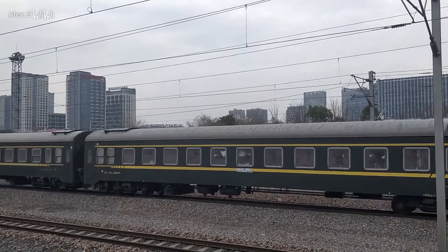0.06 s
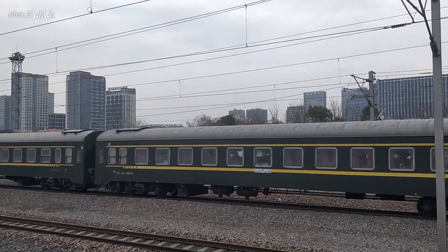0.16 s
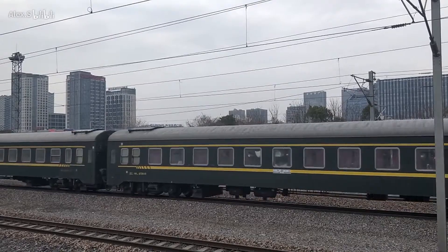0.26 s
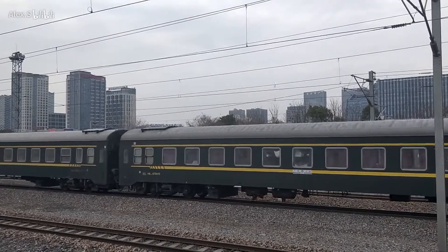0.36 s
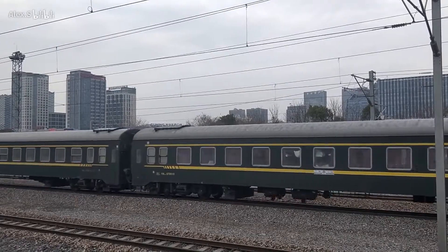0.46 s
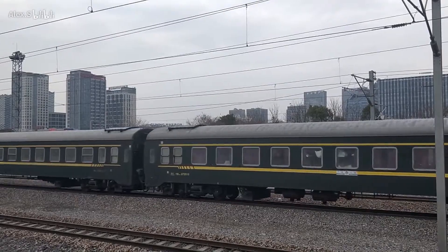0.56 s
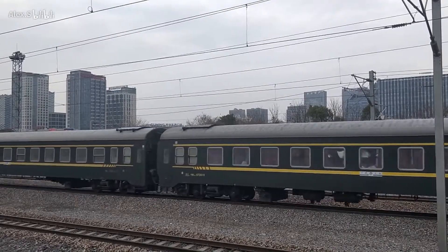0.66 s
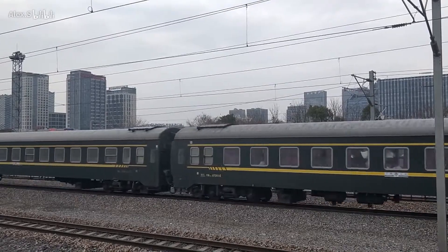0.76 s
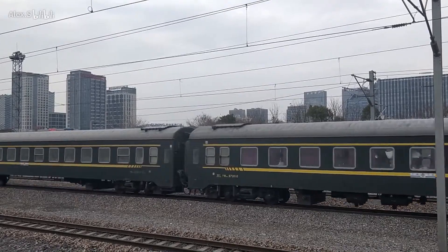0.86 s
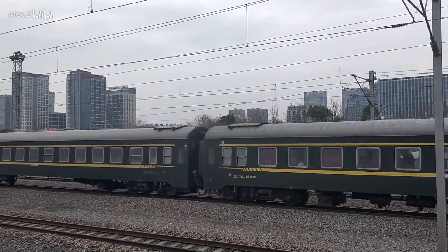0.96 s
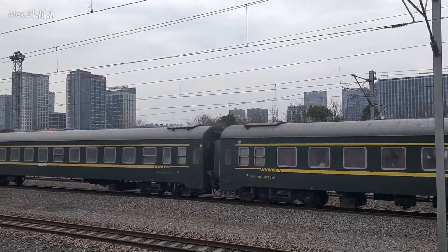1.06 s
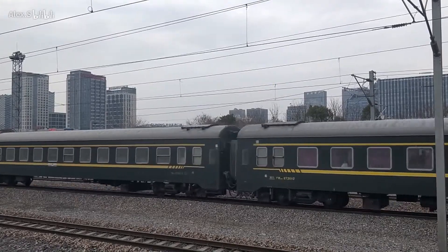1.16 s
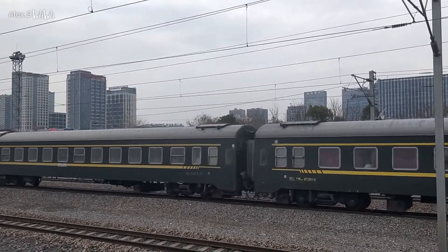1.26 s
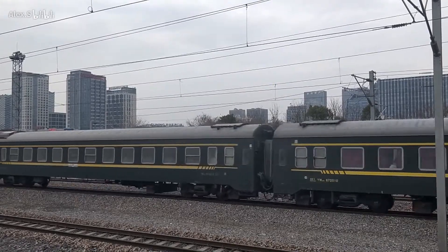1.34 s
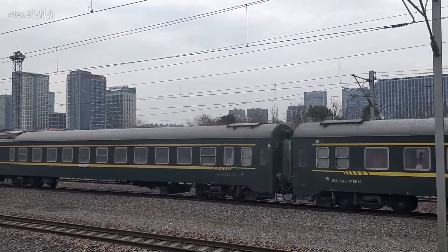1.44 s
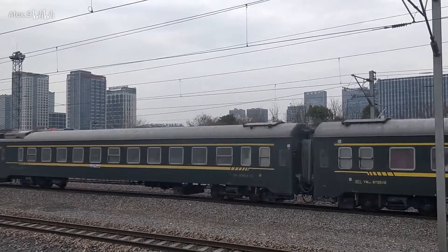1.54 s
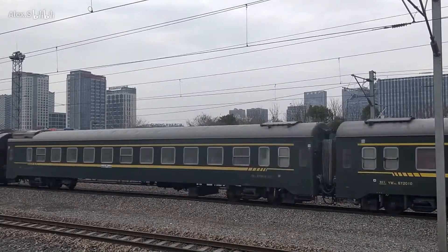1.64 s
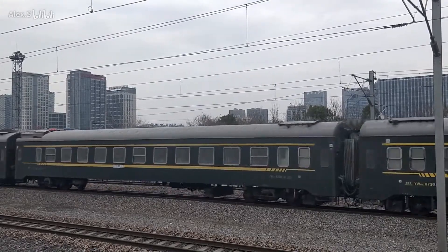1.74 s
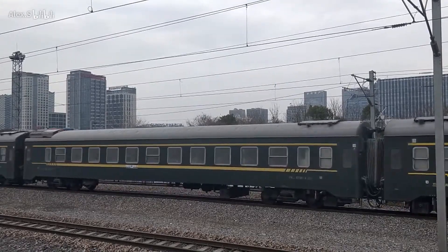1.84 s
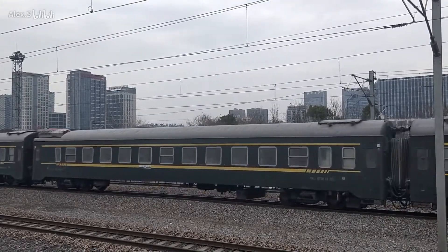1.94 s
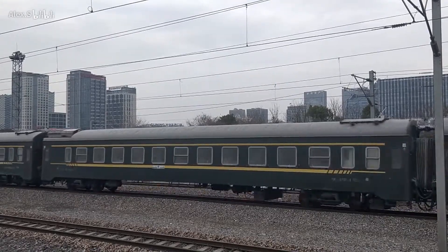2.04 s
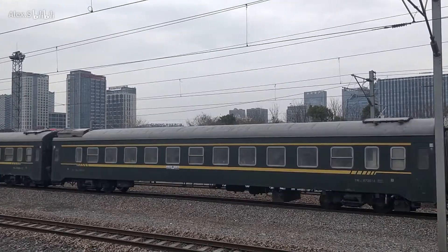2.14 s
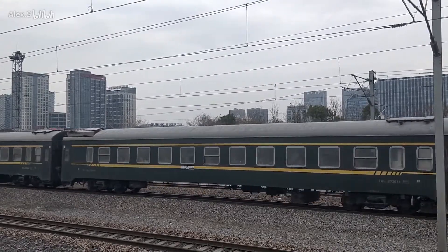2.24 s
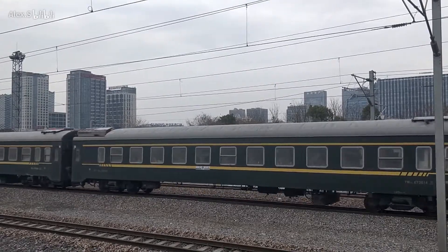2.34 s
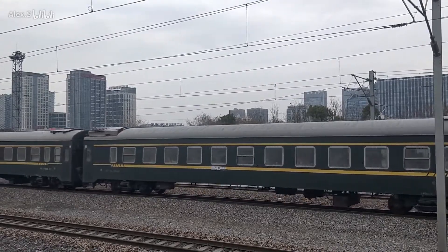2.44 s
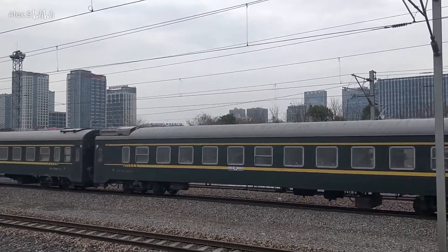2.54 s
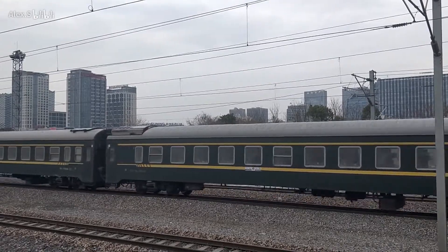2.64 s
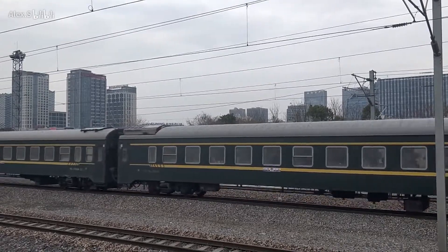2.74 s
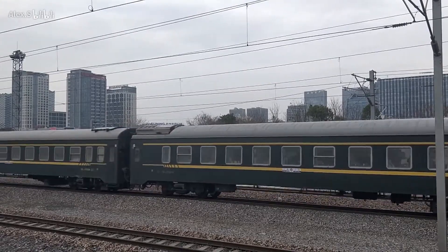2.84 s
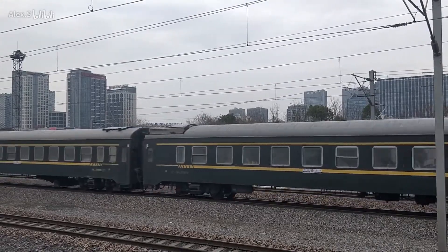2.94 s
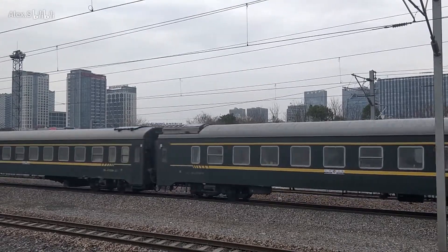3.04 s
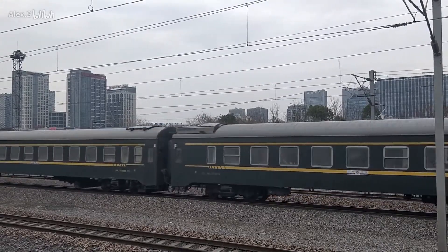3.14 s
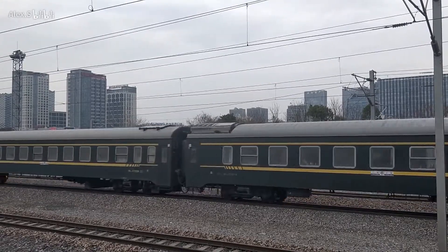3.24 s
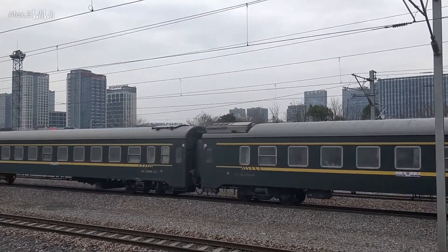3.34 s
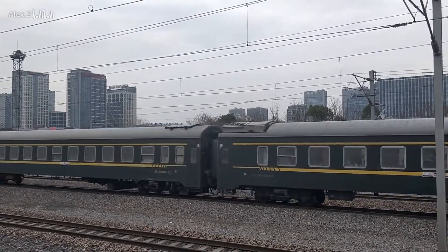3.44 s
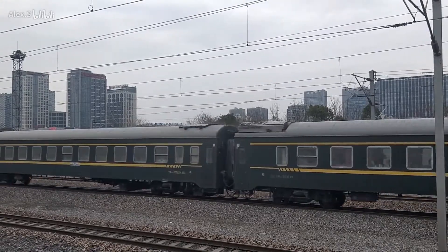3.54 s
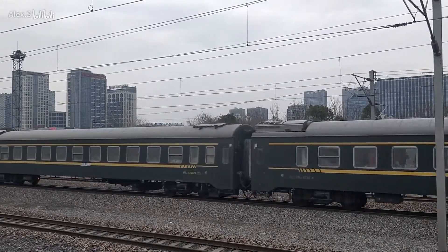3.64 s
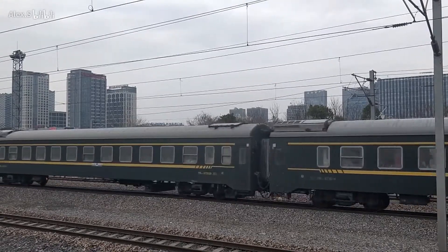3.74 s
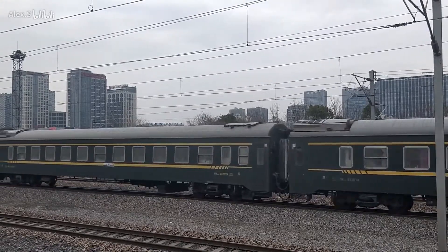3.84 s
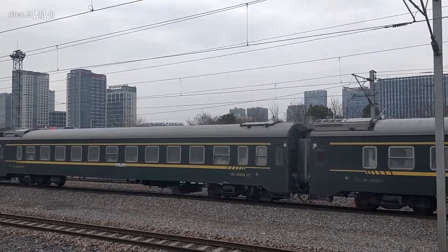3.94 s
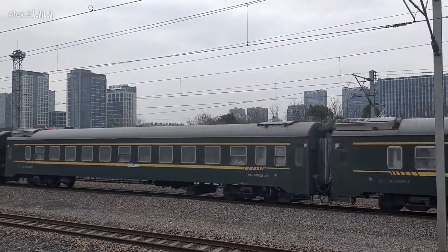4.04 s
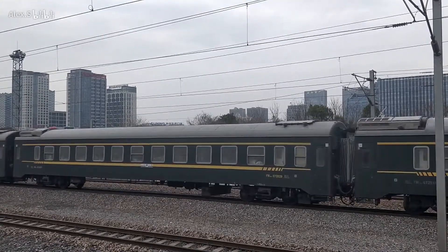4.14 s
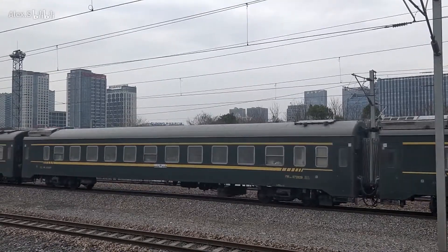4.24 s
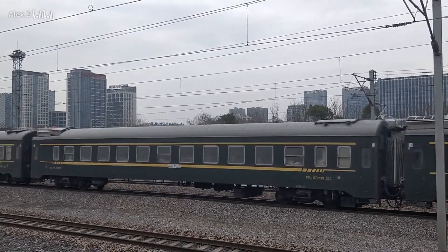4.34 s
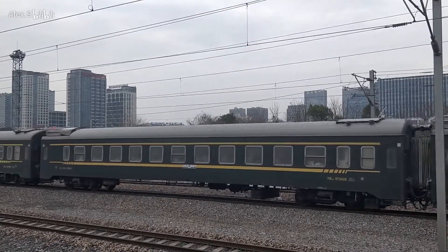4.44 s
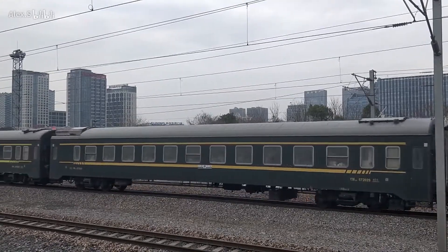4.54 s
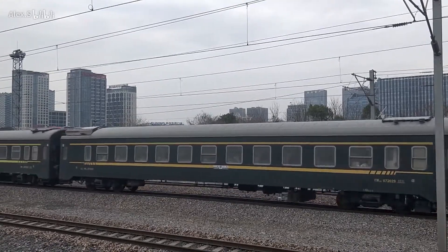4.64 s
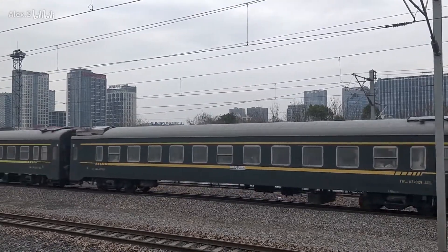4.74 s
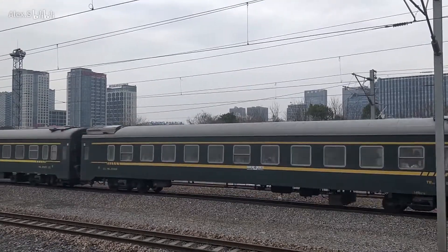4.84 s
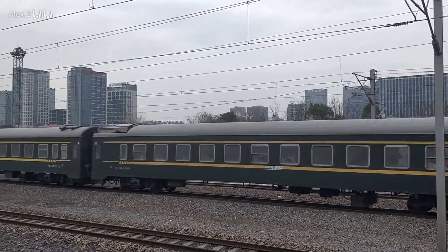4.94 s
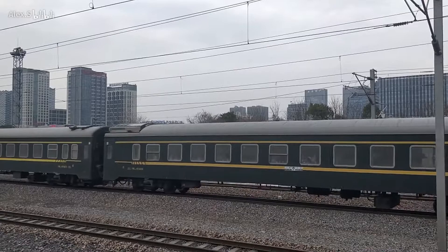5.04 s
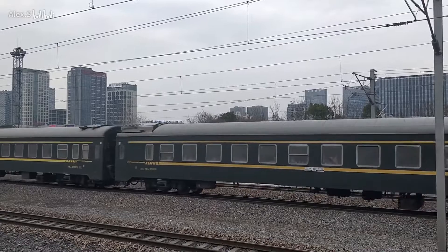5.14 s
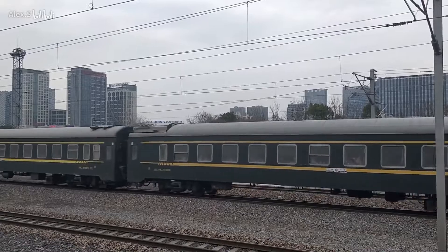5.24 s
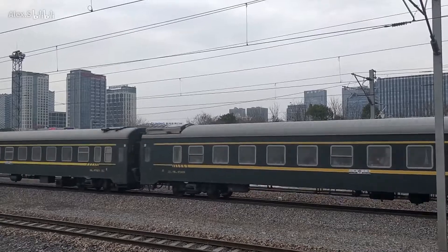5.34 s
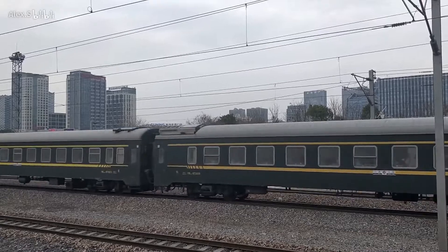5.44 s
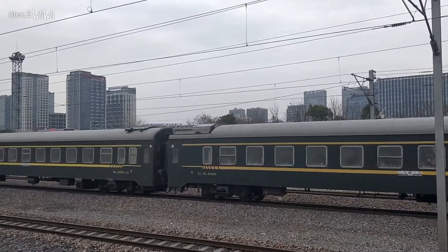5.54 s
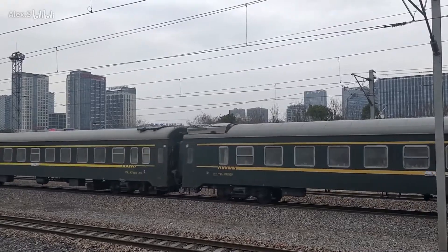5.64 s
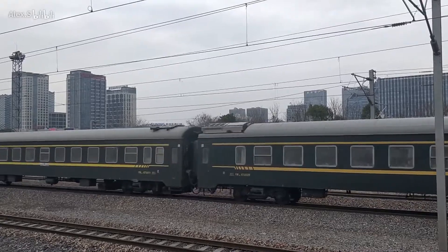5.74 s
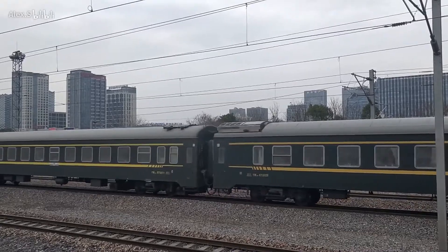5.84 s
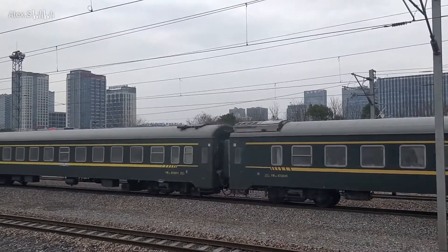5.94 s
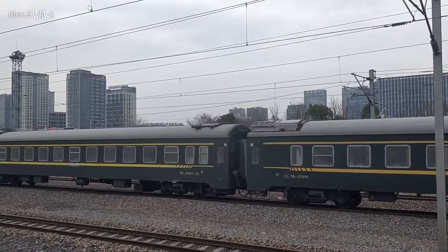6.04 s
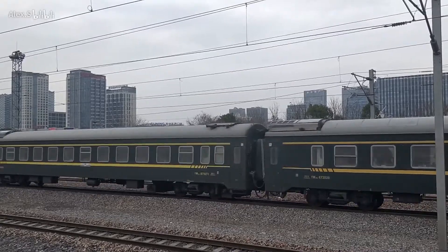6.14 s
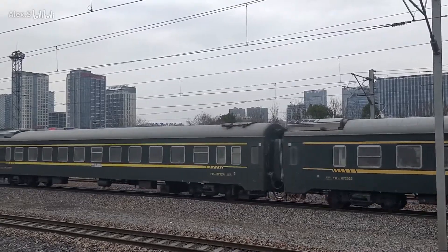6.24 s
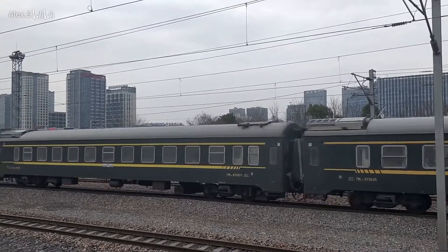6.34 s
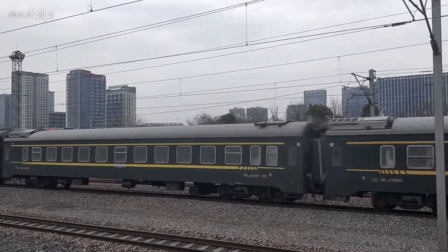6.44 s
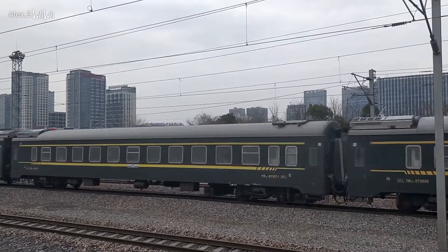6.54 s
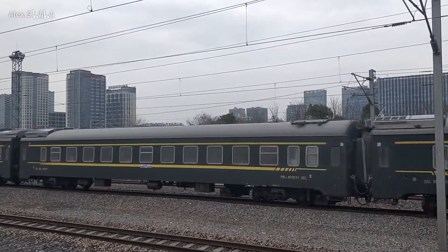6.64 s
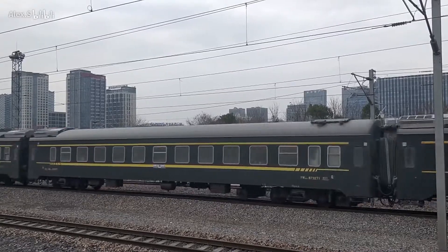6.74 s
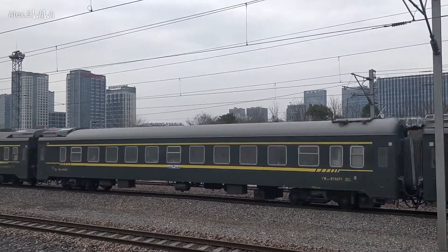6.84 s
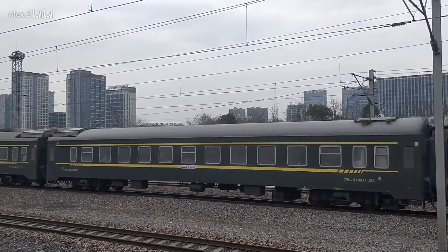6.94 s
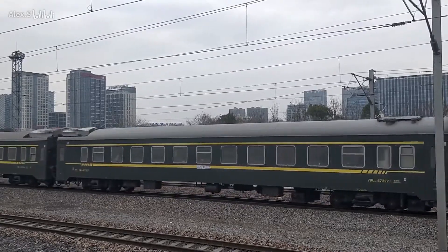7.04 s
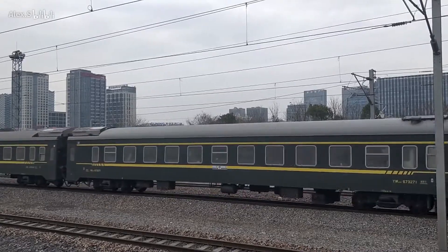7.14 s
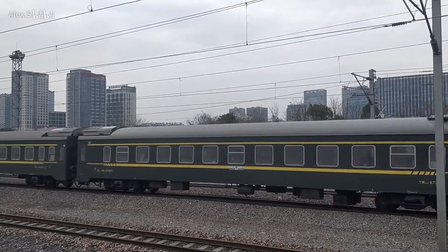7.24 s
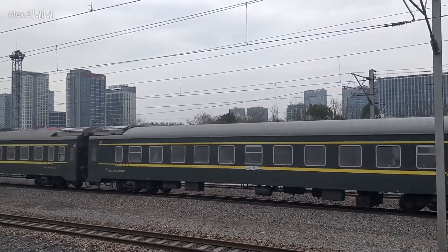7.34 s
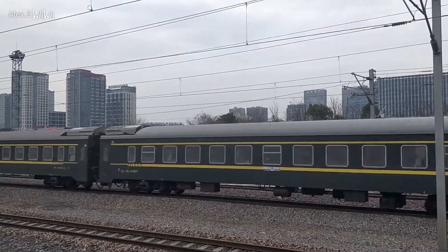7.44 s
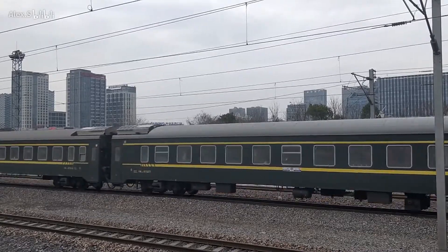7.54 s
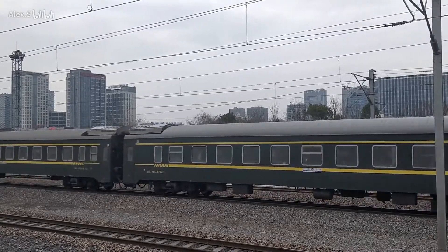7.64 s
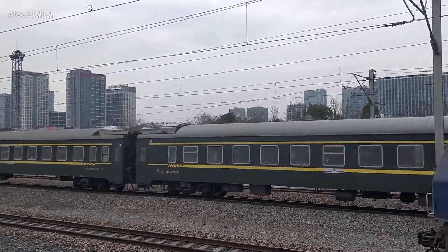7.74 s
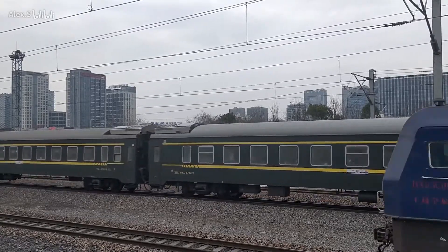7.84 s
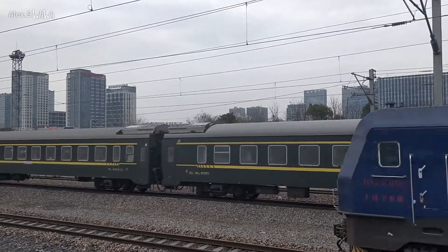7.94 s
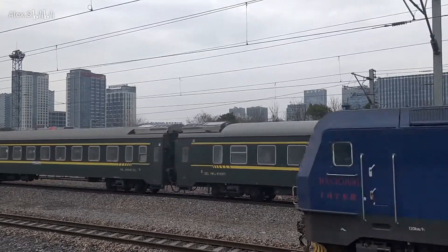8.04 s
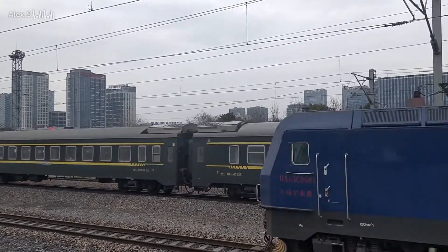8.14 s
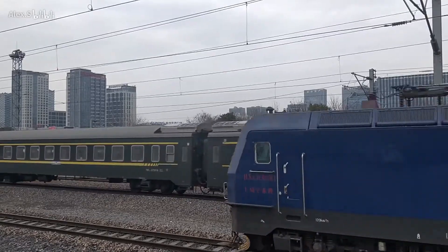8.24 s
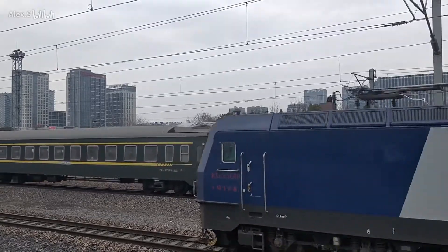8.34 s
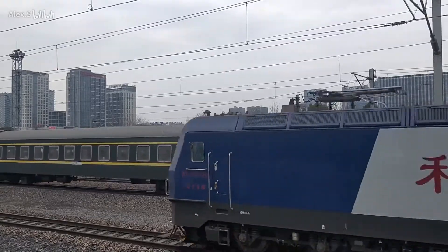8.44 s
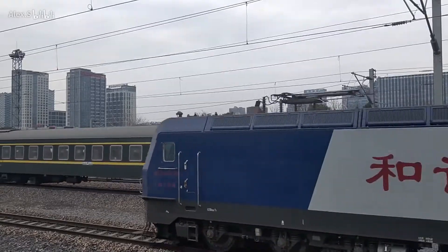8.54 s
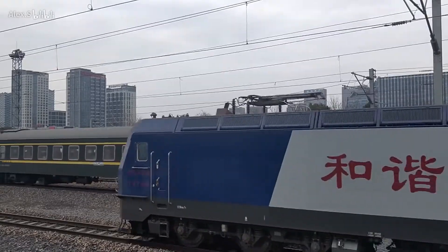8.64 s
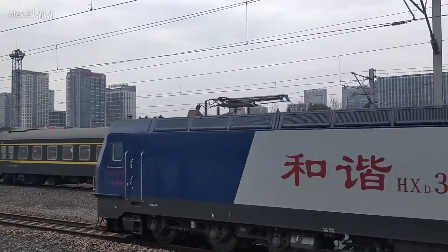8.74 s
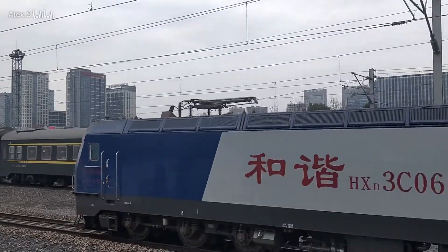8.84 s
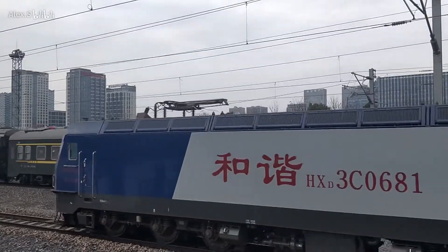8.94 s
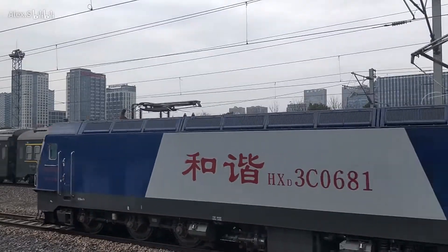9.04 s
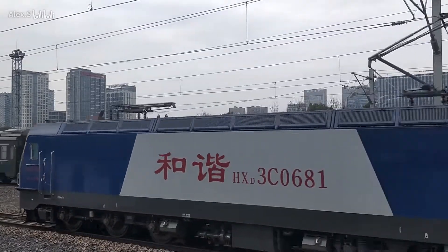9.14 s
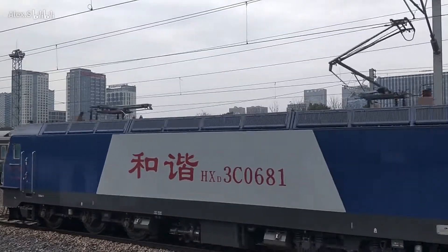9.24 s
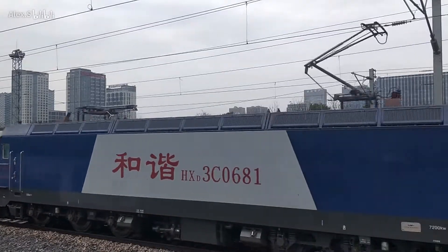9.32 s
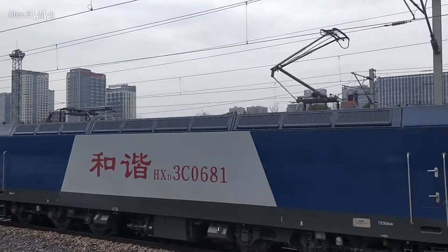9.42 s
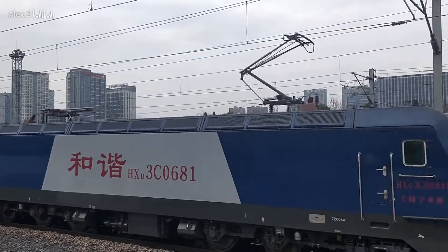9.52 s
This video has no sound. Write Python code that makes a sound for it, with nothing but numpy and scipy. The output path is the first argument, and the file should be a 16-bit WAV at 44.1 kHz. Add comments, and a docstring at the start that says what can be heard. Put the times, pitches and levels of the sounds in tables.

```python
"""Coach wheels hiss and ring from a passenger train rolling by on a far track, with one early knock and
a few rattles. An electric locomotive draws up from the right on a nearer track and comes by: wavering
narrow tones sink in pitch, blowers roar and running gear rumbles as shaped noise. The ground adds a deep
rumble. Two microphone ports a hand apart set the stereo by arrival time and colour.
"""
import sys
import numpy as np
from scipy import signal
from scipy.fft import rfft, irfft, next_fast_len
from scipy.io import wavfile
from scipy.ndimage import map_coordinates

SR = 44100
rng = np.random.default_rng(int(sys.argv[2]) if len(sys.argv) > 2 else 0)


def generate_wav(sig):
    """Save sig (samples, or channels by samples) to the path in sys.argv[1] as 16-bit PCM at SR."""
    pcm = np.round(np.clip(np.atleast_2d(sig).T, -1, 1) * 32767).astype(np.int16)
    wavfile.write(sys.argv[1], SR, pcm)


def magnitude_from_level(level_db):
    """Linear magnitude for a level in decibels (20 dB per decade)."""
    exponent = np.asarray(level_db, float) / 20
    return 10 ** exponent


N = 422456
T = np.arange(N) / SR
SIZE = next_fast_len(N + SR // 4)  # noise is made longer than the take, as moving sources read ahead
HZ = np.maximum(np.arange(SIZE // 2 + 1) * SR / SIZE, 1)

# bearings along the far train: [left port's lag behind the right/ms], one per place
COACH_LAG_MS = [.41, .2, -.05, -.3]


def shape(points):
    """Gain at every frequency from (f/Hz, level/dB) points, stepping down outside them."""
    hz, db = np.transpose(points)
    return magnitude_from_level(np.interp(np.log(HZ), np.log(hz), db, left=db[0] - 29, right=db[-1] - 3))


def noise(gain):
    """Noise of the given spectral gain, rms 1."""
    x = irfft(rfft(rng.standard_normal(SIZE)) * gain, SIZE)
    return x / x.std()


def peak(hz, width):
    """Steep resonance gain: 1 at the centre, half at the edges of its width in Hz."""
    return 1 / (1 + (2 * (HZ - hz) / width) ** 2)


def walk(rate):
    """Slow random drift with spread 1, its gain halved at the rate in Hz."""
    return noise(1 / (1 + (HZ / rate) ** 2))


def curves(table):
    """Columns of a timed table, sample by sample."""
    s, *columns = np.transpose(table)
    return [np.interp(np.arange(SIZE) / SR, s, column) for column in columns]


def arrive(x, lag_ms, squeeze=1):
    """Both ports read the source at a moving place: motion shifts pitch, bearing sets the lag."""
    place = np.cumsum(squeeze * np.ones(N)) + SR / 100
    lag = (lag_ms * np.ones(SIZE))[:N] * SR / 1000
    left = map_coordinates(x, [place - lag], order=3)
    right = map_coordinates(x, [place], order=3)
    return np.array([left, right])


def roar(gain, lag_ms, squeeze=1):
    """Direct noise from one bearing plus its unrelated reflections at each port, rms 1 together."""
    # reflected against direct sound: [f/Hz, level/dB]
    scatter = [(30, -12), (100, -19), (250, -12.5), (500, -6), (1000, -8.5), (2500, 3), (4500, -3),
               (8000, 8)]
    back = shape(scatter)
    direct_gain = gain / np.sqrt(1 + back ** 2)
    echo_gain = gain * back / np.sqrt(1 + back ** 2)
    direct = arrive(noise(direct_gain), lag_ms, squeeze)
    echoes = np.array([noise(echo_gain)[:N] for _ in direct])
    echo_share = np.sum(echo_gain ** 2) / np.sum(gain ** 2)  # share of power
    return np.sqrt(1 - echo_share) * direct + np.sqrt(echo_share) * echoes


def coaches():
    """Bogies along the train, each at its own bearing, roll as broad noise and ring their wheels."""
    # rolling noise spectrum: [f/Hz, relative level per Hz/dB]
    rolling = [(60, -9.5), (105, -1), (134, -2.5), (180, 0.5), (335, -4), (480, -5.5), (1160, -10.5),
               (1400, -12.5), (1620, -9), (2310, -16.5), (3500, -19), (3800, -22), (4100, -21),
               (4750, -22.5), (5050, -29), (5350, -23.5), (5700, -29.5), (6500, -31), (8500, -42),
               (10300, -34.5), (11200, -89)]
    # rolling noise through time: [t/s, level/dB]
    rolling_level = [(0, -26), (1.5, -25), (3, -25.5), (4.5, -24.5), (6, -24.5), (7.5, -29.5), (8.5, -29),
                     (9.6, -18.5)]
    # strength of each place along the train: [relative level/dB]
    share_db = [0.5, 1.5, -8.5, -16.5]
    # wheel resonances: [f/Hz, width/Hz, level/dB]
    wheels = [(162, 13, -40), (1530, 40, -36), (1607, 180, -35.5), (1667, 60, -39.5), (2064, 92, -39),
              (2550, 90, -45), (2755, 130, -46.5), (3270, 58, -47), (3510, 83, -47.5), (4020, 51, -55),
              (4066, 90, -46), (4640, 130, -52)]
    level_db, = curves(rolling_level)
    share = magnitude_from_level(np.array(share_db))
    share = share / np.sqrt(np.sum(share ** 2))
    out = 0
    for gain, lag_ms in zip(share, COACH_LAG_MS):
        sway = magnitude_from_level(2.0 * walk(3.4)[:N])  # dB, Hz
        out = out + gain * sway * roar(shape(rolling), lag_ms)
    out = out * magnitude_from_level(level_db[:N])
    for hz, width, db in wheels:
        swell = magnitude_from_level(db + 1.6 * walk(2.5)[:N])  # each ring swells and sinks on its own
        out = out + swell * roar(peak(hz, width), COACH_LAG_MS[0])
    return out


def running_gear(rumble_db, lag_ms, squeeze):
    """The locomotive's running gear rumbles as low shaped noise with a swaying level."""
    # rumble spectrum: [f/Hz, relative level per Hz/dB]
    rumble = [(35, -41), (60, -27), (97, -25), (226, -4.5), (324, -6.5), (528, -8), (666, -14.5),
              (895, -16), (1300, -20), (1690, -44), (2860, -120)]
    sway_db, trim_db = 1, -3.5
    level = magnitude_from_level(rumble_db + trim_db + sway_db * walk(6.))[:N]
    return level * roar(shape(rumble), lag_ms, squeeze)


def blowers(blower_db, lead_ms, trail_ms, squeeze):
    """A leading and a trailing blower roar through the same resonant ducts from two bearings."""
    # blower noise spectrum: [f/Hz, relative level per Hz/dB]
    blower = [(600, -50), (800, 0), (1070, -4), (1580, -3), (1820, 6.5), (2200, 0.5), (2750, -12.5),
              (4860, -7.5), (5600, -14), (6200, -22.5), (7600, -23.5), (9000, -25.5), (11200, -134)]
    # duct resonances: [f/Hz, width/Hz, level/dB before the common gain]
    ducts = [(1263, 31, -13), (1346, 56, -7), (1482, 40, -4), (1865, 36, -2), (1974, 35, -9.5)]
    duct_gain = 4.7
    power = shape(blower) ** 2
    for hz, width, db in ducts:
        power = power + (duct_gain * magnitude_from_level(db) * peak(hz, width)) ** 2
    gain = np.sqrt(power)
    pair = roar(gain, lead_ms, squeeze) + magnitude_from_level(-1.0) * roar(gain, trail_ms, squeeze)
    return magnitude_from_level(blower_db[:N] - 3.5) * pair


def hum(rumble_db, lag_ms, squeeze):
    """Narrow tones waver, grow with the rumble, come clear one by one and dip briefly."""
    # pitch of each tone far off: [f/Hz]
    tone_hz = [140.8, 235.6, 378.3, 546.3, 924, 451.6]
    # each tone: [level abreast/dB, level gained per dB of rumble/dB, comes clear at t/s,
    # softer before that by/dB]
    tones = [(-26.5, 0.6, 5.92, 15), (-18, 1, 3.45, 14), (-25, 0.23, 6.15, 8.5), (-21.5, 1.2, 6.8, 4),
             (-24, 1.68, 5.15, 8), (-27.5, 0.8, 8.8, 13.5)]
    # brief dips of each tone, in the order of the tones: [t/s, depth/dB, length (two spreads)/s]
    tone_dips = [
        [(6.52, 12, 0.21), (7.9, 15, 0.21), (8.39, 4, 0.08), (8.9, 11.5, 0.3), (9.3, 17, 0.2)],
        [(4.44, 20, 0.2), (5.35, 7, 0.36), (6.05, 20, .4), (7.33, 10, 0.19), (7.92, 20.5, 0.11), (8.22, 8, 0.2),
         (9.08, 15, 0.17), (9.55, 9, 0.38)],
        [(4.0, 1, 0.26), (4.95, 16, 0.19), (5.55, 15, 0.15), (6.75, 11, 0.17), (7.27, 9, .15), (7.63, 5, 0.14)],
        [(4.45, 3, 0.13), (6.4, 4.5, 0.17), (7.63, 3, 0.072), (8.33, 18, 0.17), (9.4, 7, 0.13)],
        [(7.0, 9, .1), (8.77, 7, 0.29)],
        [(9.57, 10, 0.084)],
    ]
    abreast_db = -12  # rumble before its trim at which a tone has its level abreast
    clear_s, waver = .05, .0035  # time scale of coming clear; pitch spread as a fraction
    flutter_db, rough_share = 3.5, .9  # level spread and noisy share, both per kHz of pitch
    # when each sample sent is heard
    heard = np.interp(np.arange(SIZE), np.cumsum(squeeze) + SR / 100, T)
    out = 0
    for hz, (db, steep, clear_at, veil_db), dips in zip(tone_hz, tones, tone_dips):
        khz = hz / 1000
        veil = (1 - np.tanh((heard - clear_at) / clear_s)) / 2  # 1 before coming clear, 0 after
        db = db + steep * (rumble_db - abreast_db) - veil_db * veil
        for at, depth_db, length in dips:
            db = db - depth_db * np.exp(-.5 * ((heard - at) / length * 2) ** 2)
        cycles = np.cumsum(hz * (1 + waver * walk(5.226))) / SR
        tone = np.sqrt(2) * np.sin(2 * np.pi * cycles)
        rough = rough_share * khz * noise(peak(hz, 8 + .03 * hz))
        out = out + magnitude_from_level(db + flutter_db * khz * walk(6.)) * (tone + rough)
    return arrive(out, lag_ms, squeeze)


def locomotive():
    """Rumble, blowers and hum near together; their direct sound sinks in pitch as the engine comes abreast."""
    # pitch as heard against pitch far off: [t/s, ratio]
    doppler = [(0, 1.0), (5.4, 1.0), (6.6, .994), (7.3, .988), (7.8, .981), (8.4, .971), (9.1, .959),
               (9.6, .953)]
    # left port's lag behind the right: [t/s, running gear/ms, leading blower/ms, trailing blower/ms]
    bearing = [(0, 0.29, 0.66, 0.39), (7.4, 0.41, 0.46, 0.36), (8.0, 0.35, 0.23, 0.416),
               (8.4, 0.25, 0.19, 0.43), (8.9, 0.2, -0.39, 0.1), (9.6, 0.11, -0.47, 0.043)]
    # noise as the engine nears, before trims: [t/s, rumble level/dB, blower level/dB]
    nearing = [(0.0, -30, -34), (1.5, -27, -35), (2.7, -25.5, -33.5), (3.7, -22, -30.5), (4.6, -21.5, -31),
               (5.9, -17.5, -29.5), (7.0, -15.5, -25), (7.5, -14.5, -21.5), (8.1, -13.5, -20),
               (8.7, -12.5, -17.5), (9.58, -15, -19)]
    squeeze = curves(doppler)[0][:N]
    gear_ms, lead_ms, trail_ms = curves(bearing)
    rumble_db, blower_db = curves(nearing)
    out = running_gear(rumble_db, gear_ms, squeeze)
    out = out + blowers(blower_db, lead_ms, trail_ms, squeeze)
    return out + hum(rumble_db, gear_ms, squeeze)


def ground():
    """Both trains shake the ground in a deep, uneven rumble, made as low shaped noise."""
    # rumble through time: [t/s, level/dB]
    ground_level = [(0.0, -38), (2.3, -36), (2.85, -41.5), (3.5, -34.5), (5.3, -37.5), (5.7, -40),
                    (6.3, -33), (9.58, -41)]
    # rumble spectrum: [f/Hz, relative level per Hz/dB]
    ground_shape = [(20, -5), (35, 2.5), (55, 6), (68, 7), (77, 15.5), (88, 5.5), (110, -35)]
    sway_db = 1.5
    level = magnitude_from_level(curves(ground_level)[0] + sway_db * walk(3.2))[:N]
    return level * roar(shape(ground_shape), COACH_LAG_MS[0])


def knocks():
    """Lone small blows, each one damped ring."""
    # blows: [t/s, peak level before damping/dB, f/Hz, time to fall 60 dB/s, left minus right level/dB]
    blows = [(0.352, -15, 1260, 0.022, 1), (6.02, -28, 3020, 0.023, -13)]
    out = 0
    for s, db, hz, t60, pan_db in blows:
        age = np.maximum(T - s, 0)
        ring = np.sin(2 * np.pi * hz * age) * np.exp(-np.log(1000) * age / t60)
        port_db = db + np.array([[pan_db], [-pan_db]]) / 2
        out = out + magnitude_from_level(port_db) * ring
    return out


def rattles():
    """Short bright shakes of loose metal in the running gear, as swells of shaped noise."""
    # shakes: [t/s, level at the height/dB, length (two spreads)/s]
    shakes = [(1.163, -38, 0.078), (1.403, -40.5, 0.09), (1.934, -37.5, 0.064), (2.163, -34, 0.062),
              (3.58, -34, 0.041), (3.799, -34, 0.037), (4.346, -50, .03), (4.578, -38, 0.036),
              (5.988, -31, 0.031), (6.22, -37, 0.12), (6.987, -33, 0.011)]
    # rattle spectrum: [f/Hz, relative level per Hz/dB]
    rattle_shape = [(1500, -7), (2500, -4.5), (4000, 3), (6500, -3), (8500, -7), (10200, 2.5), (11200, -28)]
    swell = 0
    for s, db, length in shakes:
        swell = swell + magnitude_from_level(db) * np.exp(-.5 * ((T - s) / length * 2) ** 2)
    return swell * roar(shape(rattle_shape), COACH_LAG_MS[0])


def scene():
    """Both trains, the ground under them and their small noises."""
    return coaches() + locomotive() + ground() + knocks() + rattles()


def band_limit(x):
    """A steep low-pass at the top of the band."""
    return signal.sosfilt(signal.butter(12, 11050, fs=SR, output="sos"), x)


def record(dry):
    """The microphone input rounds the loudest peaks, and the two ports differ in colour."""
    # left port over right port: [f/Hz, level/dB]
    port_colour = [(60, 2), (190, 2.5), (340, 1.2), (590, 1.0), (1050, 0), (1870, -3), (3320, -2),
                   (5890, -0.3), (8000, 4.5)]
    # the highest hiss reaches the left port only, left over right: [f/Hz, level/dB]
    top_left = [(8600, 10), (9000, 60), (11200, 60)]
    hz, db = np.transpose(port_colour)
    left = np.sqrt(magnitude_from_level(np.interp(np.log(HZ), np.log(hz), db)))  # half of the difference in dB
    hz, db = np.transpose(port_colour + top_left)
    right = left / magnitude_from_level(np.interp(np.log(HZ), np.log(hz), db))
    rounded = np.tanh(0.69 * dry) / 0.71
    mix = irfft(rfft(rounded, SIZE) * np.array([left, right]), SIZE)[:, :N]
    return band_limit(mix)


dry = scene()
out = record(dry)
generate_wav(out)
```